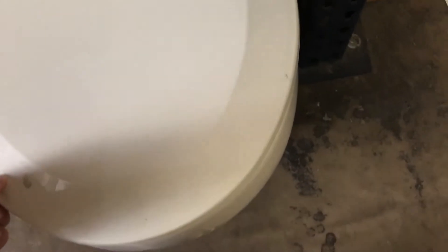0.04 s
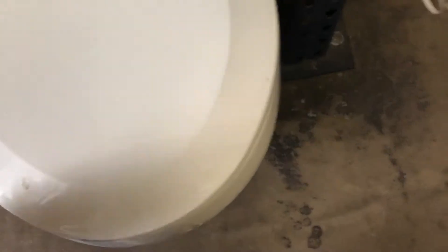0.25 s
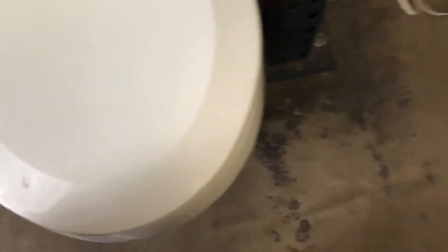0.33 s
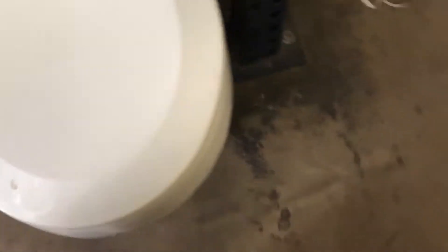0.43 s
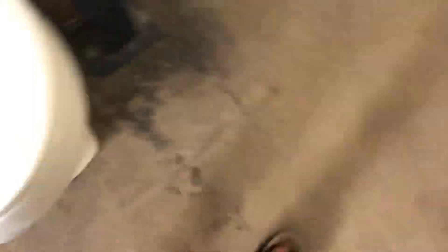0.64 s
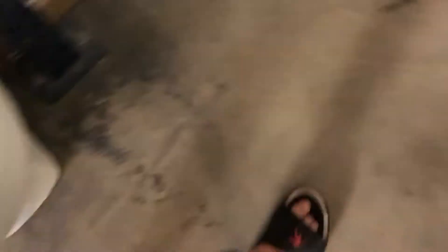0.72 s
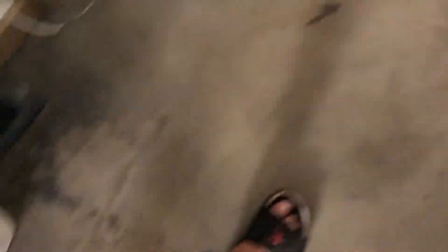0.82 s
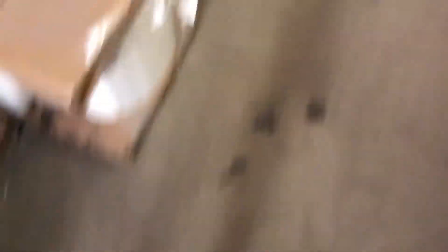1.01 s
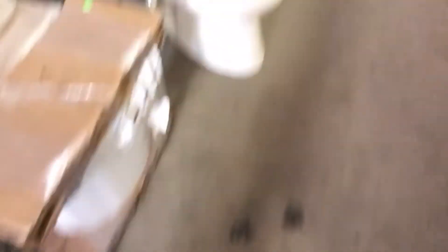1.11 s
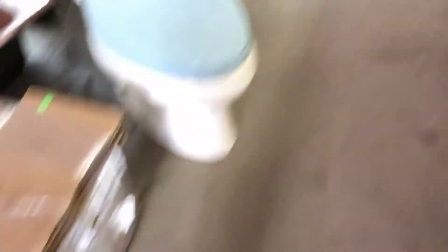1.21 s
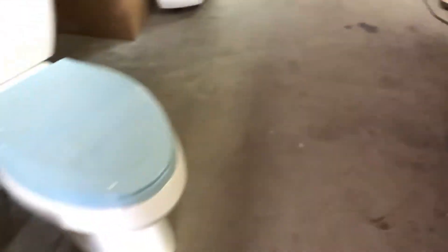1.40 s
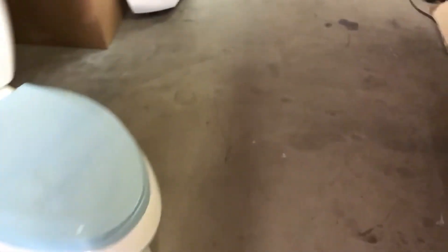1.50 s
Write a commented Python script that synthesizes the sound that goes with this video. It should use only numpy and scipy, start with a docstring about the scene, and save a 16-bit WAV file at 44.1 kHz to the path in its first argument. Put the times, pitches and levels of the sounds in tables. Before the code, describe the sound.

Close handheld microphone in a hard-floored storage room: one sharp toilet lid slam with a tiny bounce and brief reverberation, then much quieter cloth rustle and a few light sandal steps over low room rumble.

```python
"""A toilet lid drops onto the seat and bowl in a concrete-floored room: bursts of noise make the hard crack
and the room's answer, and fading sines make the short hollow ring and the low thump. A small rebound follows.
Then whoever dropped it walks on: shaped noise gives a few light sandal taps and rustling clothes.
Behind it all, low-pitched noise makes a room rumble, and slowly swelling sines make faint hums."""
import sys
import numpy as np
from scipy import signal
from scipy.fft import rfft, irfft
from scipy.io import wavfile

SR = 44100
rng = np.random.default_rng(int(sys.argv[2]) if len(sys.argv) > 2 else 0)


def transcribe(u):
    """Save the signal u as a 16-bit wav file named by the first command-line argument.

    u: samples, shape (n,) or (channels, n), limited to [-1, 1]; the rate is SR.
    q: integer samples, one column per channel.
    """
    v = np.clip(np.atleast_2d(u).T, -1, 1)
    q = np.round(v * 32767).astype(np.int16)
    wavfile.write(sys.argv[1], SR, q)


N = 68355
TIME = np.arange(N) / SR  # seconds

# In all tables and settings, t60 is the time a sound takes to fade by 60 dB.
# Spectrum levels "per hertz" are relative: they set the tone, and loudness is set elsewhere.

# The lid lands, slaps flat and rebounds. Each row: start in seconds, level in dB relative to
# the shared crack level, t60 in seconds.
CONTACTS = [(0.2021, -11, 0.03), (0.2011, 0.5, 0.023), (0.2040, 5.5, 0.016), (0.2075, -10, .06),
            (0.235, -17.5, 0.023), (0.2381, -11.5, 0.031), (0.2545, -20, 0.022)]
# Tone of each crack, many dense short-lived vibrations. Each row: frequency in Hz, level in dB per hertz.
CRACK_SPECTRUM = [(100, -11), (470, -23), (640, -5), (1500, -1.5), (3300, -1), (6500, -5), (10000, -18),
                  (13000, -23.5), (16000, -38.5)]
# Ring of lid and seat. Each row: frequency in Hz, level in dB before the swell, t60 in seconds.
LID_MODES = [(552, -33, 0.11), (623, -33.5, .15), (745.4, -27.5, 0.13), (922, -25.5, 0.076),
             (1106, -22, .22), (1199.6, -17.5, 0.12), (1215, -26, .24), (1280, -24, 0.14),
             (1411.5, -13.5, 0.16), (1531, -15, 0.22), (1677, -19.5, 0.17), (1859, -9, .11),
             (1943, -24.5, 0.31), (2042, -24, 0.25), (2363, -22.5, 0.21), (2393, -21.5, 0.24),
             (2598, -24, 0.23), (3075, -22.5, 0.11), (3206, -24.5, 0.073), (3353, -19.5, .15),
             (3920, -21.5, 0.074), (4125, -17.5, 0.091), (4559, -25.5, 0.11)]
# Thump of the bowl and the air shut in it. Each row: frequency in Hz, level in dB, t60 in seconds.
BOWL_MODES = [(68.4, -26.5, 0.26), (96.6, -39, 0.082), (128.6, -15.5, 0.19), (147.3, -12.5, 0.23),
              (203, -22, 0.21), (248, -21.5, 0.21), (292, -33, .2), (335, -32.5, 0.24)]
# The room's answer to the slam. Each row: frequency in Hz, level in dB per hertz, t60 in seconds.
ROOM_TAIL = [(50.5, -11, .19), (150, -6.5, .22), (370, -5, .21), (480, -22.5, 0.41), (607, -9.5, .18),
             (810, -12.5, 0.26), (1230, -2.5, 0.25), (3250, -5, .19), (6190, -10, 0.18),
             (9930, -25.5, 0.18), (15960, -38.5, .16)]
# Sandal taps. Each row: start in seconds, level in dB, t60 in seconds, lower resonance in Hz, upper resonance
# in Hz, lower resonance in dB relative to the upper, room tail in dB relative to the direct tap.
STEPS = [(0.418, -50.5, .06, 1280, 1880, 5, -12), (0.544, -48, .04, 1150, 1470, -8, -12),
         (0.8222, -36, .016, 2250, 3950, 3, -18), (1.0396, -37, .03, 463, 1420, 0, -15)]
# Broad click under a tap's resonances. Each row: frequency in Hz, level in dB relative to the upper resonance.
STEP_SKIRT = [(100, -9), (1000, -8.5), (3200, -10.5), (5000, -21), (16000, -23.5)]
# Rustle of clothes and hand. Each row: time in seconds, level in dB before the flutter.
RUSTLE_LEVEL = [(0, -62), (.1, -66), (.19, -52), (.33, -58), (.45, -51.5), (.66, -51.5), (.72, -58.5),
                (.80, -58.5), (.83, -50), (.862, -60), (.885, -64), (.96, -55), (1.06, -61.5),
                (1.11, -79.5), (1.28, -68), (1.34, -62.5), (1.45, -65), (1.55, -59)]
# Tone of the rustle. Each row: frequency in Hz, level in dB per hertz.
RUSTLE_SPECTRUM = [(300, 0), (1400, 4), (3800, 4), (6500, 0.5), (10500, -5), (13000, -3.5), (16000, -10)]
# Bright swishes of cloth. Each row: start in seconds, level in dB before the flutter, length in seconds.
SWISHES = [(0.119, -62, 0.047), (0.825, -58.5, 0.042), (0.935, -58.5, 0.06), (1.309, -62.5, .045)]
# Tone of the swishes. Each row: frequency in Hz, level in dB per hertz.
SWISH_SPECTRUM = [(1000, -30), (4500, -14), (6500, -2), (9000, 3), (10500, -5.5), (13000, 0), (16000, -19)]
# Faint hums heard in passing. Each row: frequency in Hz, peak level in dB, time when loudest in seconds,
# spread in seconds.
HUMS = [(443, -55, 0.882, 0.11), (252, -54, 1.39, 0.065), (263, -54.5, .8, 0.08), (367, -59, 0.51, 0.076),
        (385, -59, .02, 0.063)]
# Tone of the room rumble. Each row: frequency in Hz, level in dB per hertz.
AMBIENCE_SPECTRUM = [(15, -62), (25, -11), (102, 1), (145, -9.5), (256, -7.5), (293, -7.5), (427, -8.5),
                     (463, -16), (607, -15.5), (936, -18), (1440, -17), (2760, -25), (16000, -42)]

SLAM_S = 0.2021  # when the ring, the thump and the room tail start
CRACK_DB = -6.5
LID_BUILD_S, BOWL_BUILD_S = 0.002, 0.003
SWELL_DB, SWELL_AFTER_S, SWELL_SPREAD_S = 5, 0.013, 0.007
TAIL_DB, TAIL_BUILD_S = -13, 0.0033
STEP_WIDTH_OCTAVES, STEP_ROOM_T60_S = 0.24, 0.3
GRAINS_PER_S, GRAIN_SPREAD_DB = 610, 6.5  # how often cloth catches, and how uneven the catches are
GRAIN_DB = -12.5  # catches relative to the smooth hiss
FLUTTER_DB, FLUTTER_PER_S = 1.13, 58  # typical size and number of random level changes
SWISH_EDGE_S = 0.004
AMBIENCE_DB = -51.5
LOW_CUT_HZ, TOP_CUT_HZ = 33, 16760


def cracks():
    """Every contact gives a short bright crack: a fading burst of noise."""
    total = 0
    for start, db, t60 in CONTACTS:
        noise = colour(rng.standard_normal(N), CRACK_SPECTRUM)
        total = total + from_db(db) * blow(start, t60) * noise
    return from_db(CRACK_DB) * total


def ring(modes, build):
    """A struck body vibrates at its own pitches, each a fading sine set off by the slam."""
    total = 0
    for k, (hz, db, t60) in enumerate(modes):
        sign = (-1) ** k  # neighbouring pitches push in opposite directions
        sine = np.sin(2 * np.pi * hz * (TIME - SLAM_S))
        total = total + sign * from_db(db) * blow(SLAM_S, t60, build) * sine
    return total


def lid_ring():
    """Lid and seat ring, and the first reflections briefly reinforce them."""
    age = TIME - SLAM_S - SWELL_AFTER_S
    swell = from_db(SWELL_DB * np.exp(-(age / SWELL_SPREAD_S) ** 2 / 2))
    return swell * ring(LID_MODES, LID_BUILD_S)


def bowl_thump():
    """The bowl and the air shut in it answer with low fading sines."""
    return ring(BOWL_MODES, BOWL_BUILD_S)


def room_tail():
    """Scattered reflections of the slam are noise that dies away at its own pace in each band."""
    spectrum = rfft(colour(rng.standard_normal(N), ROOM_TAIL))
    hz = np.fft.rfftfreq(N, 1 / SR)
    edges = np.geomspace(20, 20000, 16)
    total = 0
    for low, high in zip(edges, edges[1:]):
        band = irfft(spectrum * (hz >= low) * (hz < high), N)
        t60 = at_hz(ROOM_TAIL, np.sqrt(low * high), axis=2)
        total = total + band * blow(SLAM_S, t60, TAIL_BUILD_S)
    return from_db(TAIL_DB) * total


def steps():
    """Each sandal tap is a noise click with two resonances and a faint room tail."""
    total = 0
    hz = np.geomspace(30, 16000, 120)
    for start, db, t60, lower_hz, upper_hz, lower_db, room_db in STEPS:
        upper = hump(hz, upper_hz, STEP_WIDTH_OCTAVES)
        lower = from_db(lower_db) * hump(hz, lower_hz, STEP_WIDTH_OCTAVES)
        shape = upper + lower + from_db(at_hz(STEP_SKIRT, hz))
        spectrum = np.column_stack([hz, 20 * np.log10(shape)])
        noise = colour(rng.standard_normal(N), spectrum)
        envelope = blow(start, t60) + from_db(room_db) * blow(start, STEP_ROOM_T60_S)
        total = total + from_db(db) * noise * envelope
    return total


def cloth_friction():
    """Sliding cloth hisses, with tiny catches of uneven size at random moments."""
    sizes = from_db(GRAIN_SPREAD_DB * np.minimum(rng.exponential(1, N), 4))
    signs = rng.choice([-1, 1], N)
    happens = rng.random(N) < GRAINS_PER_S / SR
    grains = rms_one(sizes * signs * happens)
    return rng.standard_normal(N) + from_db(GRAIN_DB) * grains


def swish_level():
    """Each swish of cloth fades in, holds and fades out with soft edges."""
    total = 0
    for start, db, length in SWISHES:
        fade_in = np.tanh((TIME - start) / SWISH_EDGE_S)
        fade_out = np.tanh((TIME - start - length) / SWISH_EDGE_S)
        total = total + from_db(db) * (fade_in - fade_out) / 2
    return total


def rustle():
    """Cloth slides unevenly: a fluttering hiss and a few brighter swishes."""
    hiss = colour(cloth_friction(), RUSTLE_SPECTRUM)
    level = from_db(np.interp(TIME, *np.transpose(RUSTLE_LEVEL)))
    wander = np.interp(TIME * FLUTTER_PER_S, np.arange(N), rng.standard_normal(N))
    flutter = from_db(FLUTTER_DB * wander)
    swishes = swish_level() * colour(rng.standard_normal(N), SWISH_SPECTRUM)
    return flutter * (level * hiss + swishes)


def hums():
    """Faint steady tones swell and fade as the listener moves."""
    total = 0
    for hz, db, loudest, spread in HUMS:
        swell = np.exp(-((TIME - loudest) / spread) ** 2 / 2)
        sine = np.sin(2 * np.pi * (hz * TIME + rng.random()))
        total = total + from_db(db) * swell * sine
    return total


def room_rumble():
    """The room's background is steady noise, strongest in the bass."""
    return from_db(AMBIENCE_DB) * colour(rng.standard_normal(N), AMBIENCE_SPECTRUM)


def blow(start, t60, build=1e-4):
    """Loudness curve of a blow: quick build-up, then a steady fade in dB; times in seconds."""
    age = np.maximum(TIME - start, 0)
    return (1 - np.exp(-age / build)) * np.exp(-np.log(1000) * age / t60)


def colour(x, spectrum):
    """Give a steady signal the tone of a spectrum table, with an average (rms) level of 1."""
    gain = from_db(at_hz(spectrum, np.fft.rfftfreq(N, 1 / SR)))
    return rms_one(irfft(rfft(x) * gain, N))


def hump(hz, centre_hz, octaves):
    """A broad resonance, bell-shaped when pitch is counted in octaves."""
    return np.exp(-(np.log2(hz / centre_hz) / octaves) ** 2 / 2)


def at_hz(points, hz, axis=1):
    """Read a table column between its rows, with frequency on a log scale."""
    table = np.array(points)
    return np.interp(np.log(hz + 1e-9), np.log(table[:, 0]), table[:, axis])


def rms_one(x):
    """Scale a signal to an average (rms) level of 1."""
    return x / np.sqrt(np.mean(x ** 2) + 1e-20)


def from_db(db):
    """Turn decibels into a factor to multiply by."""
    return 10 ** (np.asarray(db) / 20)


def scene():
    """The slam, then the walk away, over the sound of the room."""
    slam = cracks() + lid_ring() + bowl_thump() + room_tail()
    walk = steps() + rustle()
    background = hums() + room_rumble()
    return (slam + walk + background)[None]  # one channel


def record(dry):
    """The loudest peaks are rounded, then the deepest bass and the very top are cut."""
    rounded = np.tanh(dry)
    low_cut = signal.butter(2, LOW_CUT_HZ, "high", fs=SR, output="sos")
    top_cut = signal.cheby2(16, 70, TOP_CUT_HZ, fs=SR, output="sos")
    return signal.sosfilt(top_cut, signal.sosfilt(low_cut, rounded))


dry = scene()
out = record(dry)
transcribe(out)
```